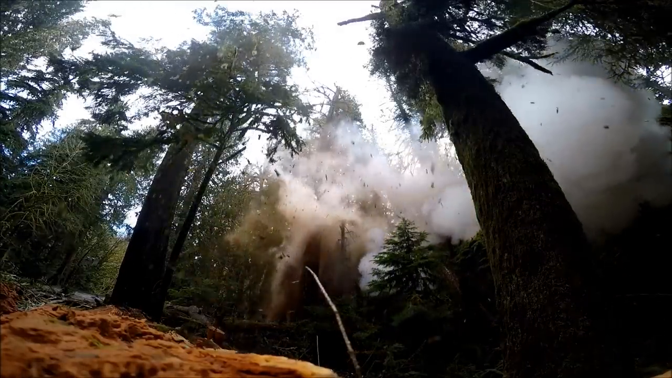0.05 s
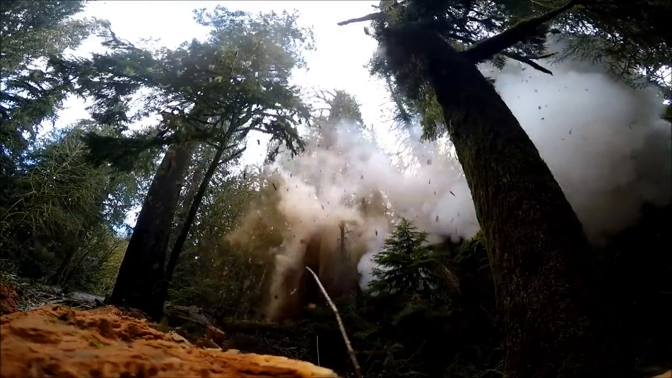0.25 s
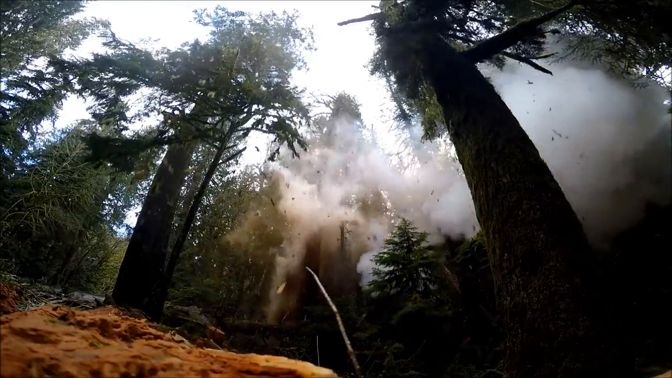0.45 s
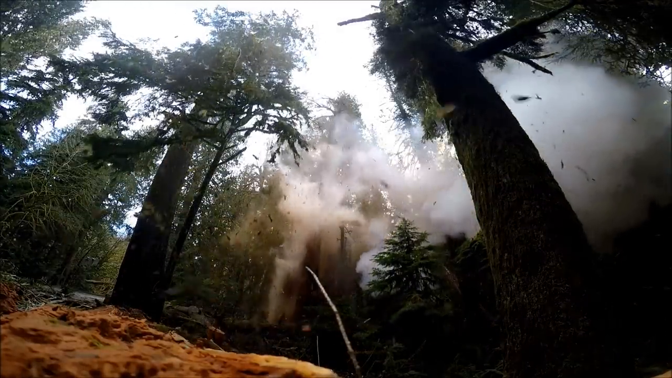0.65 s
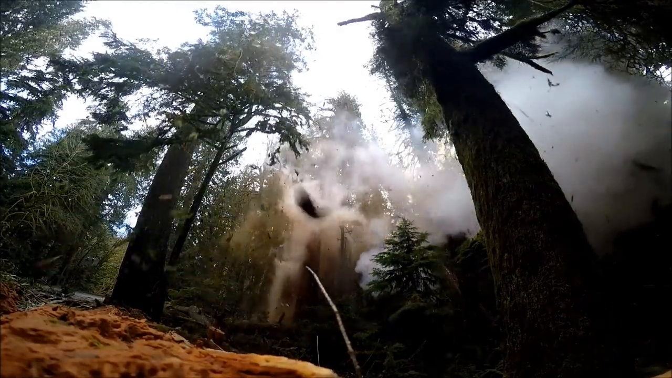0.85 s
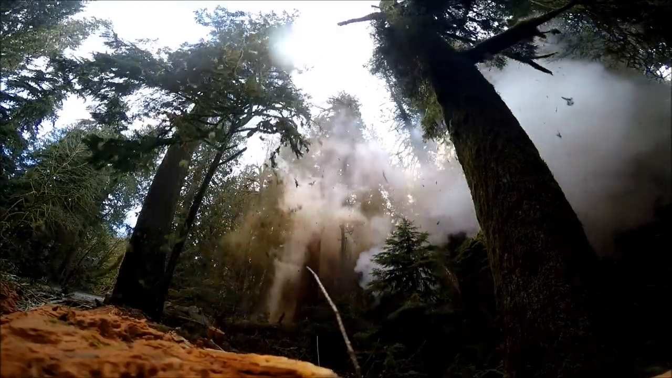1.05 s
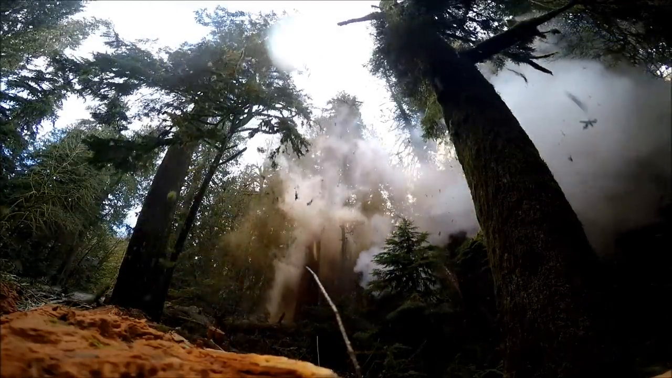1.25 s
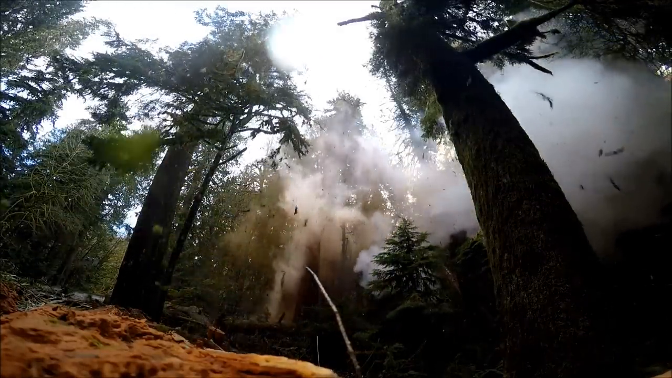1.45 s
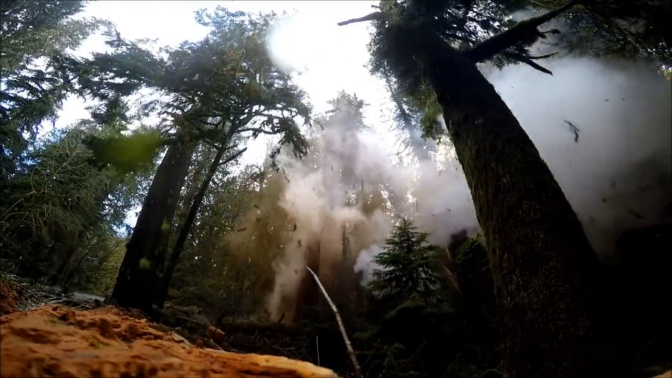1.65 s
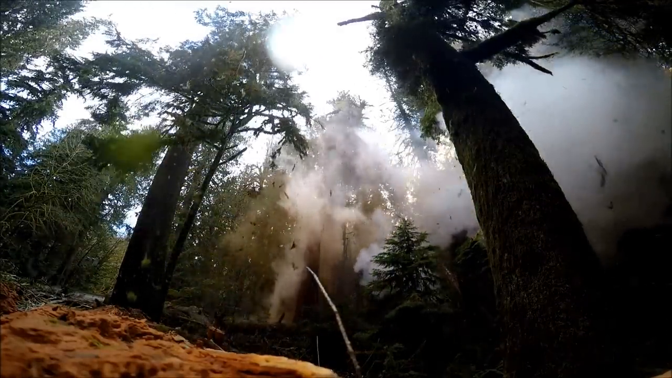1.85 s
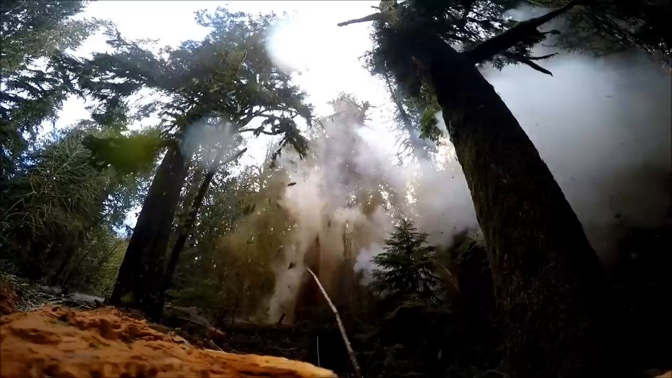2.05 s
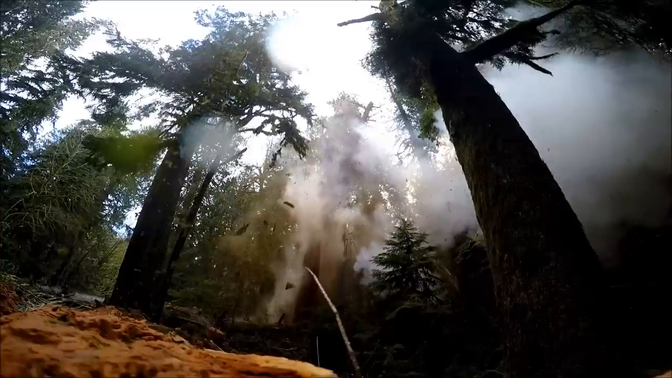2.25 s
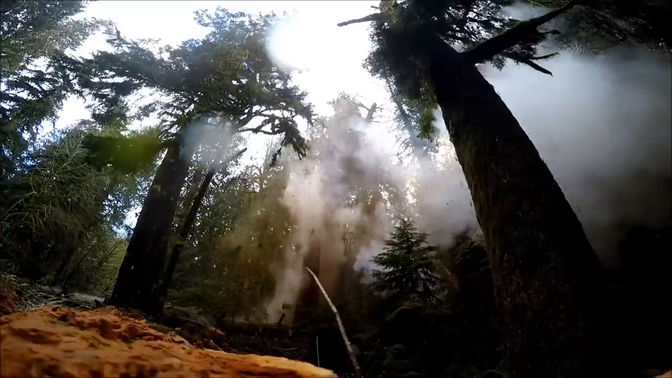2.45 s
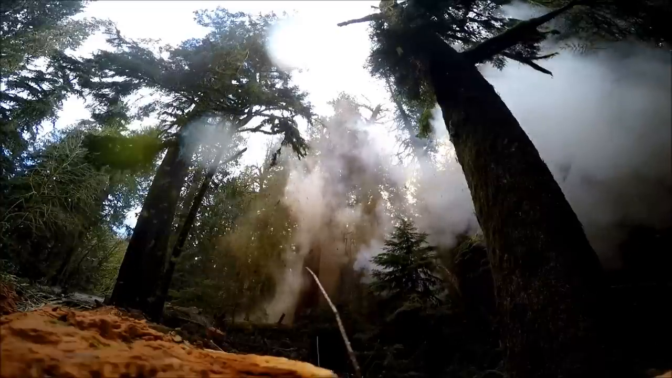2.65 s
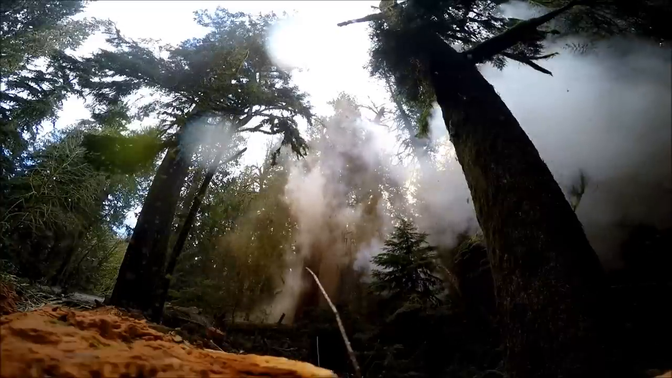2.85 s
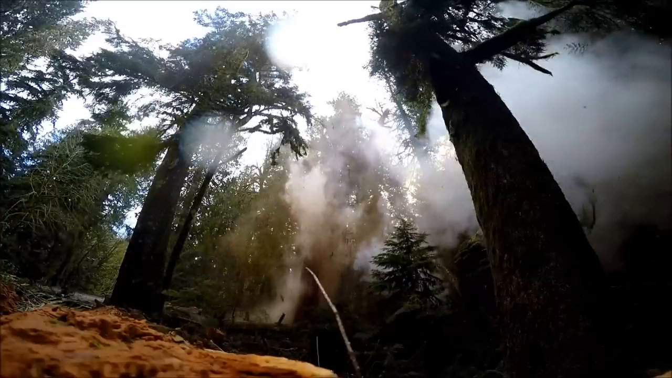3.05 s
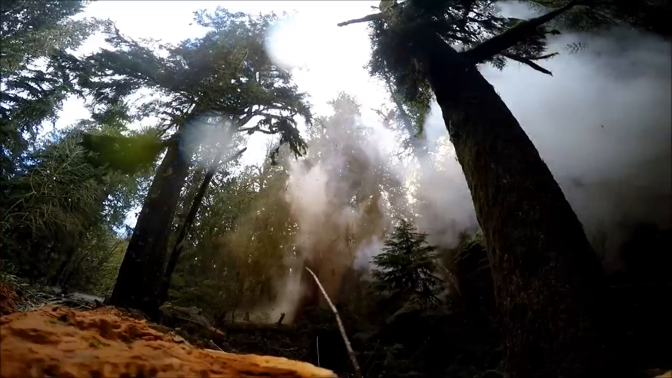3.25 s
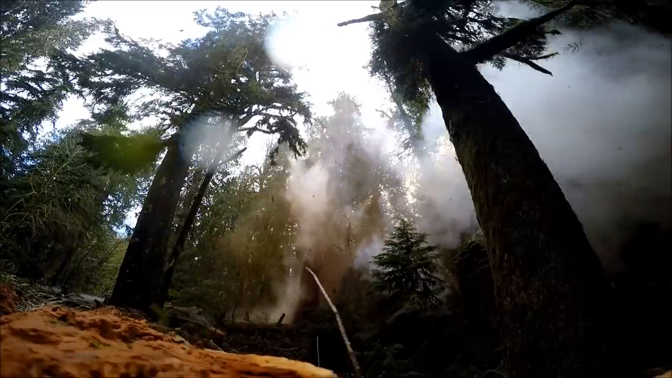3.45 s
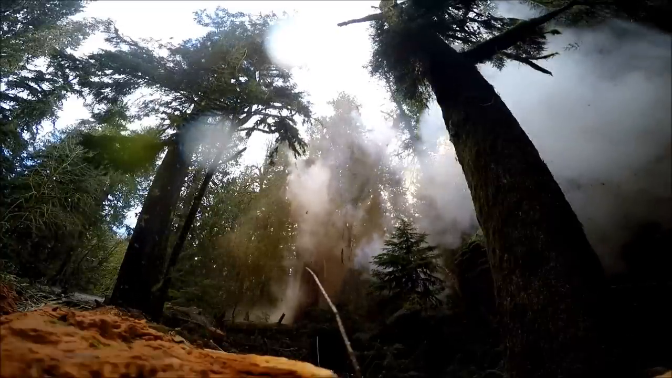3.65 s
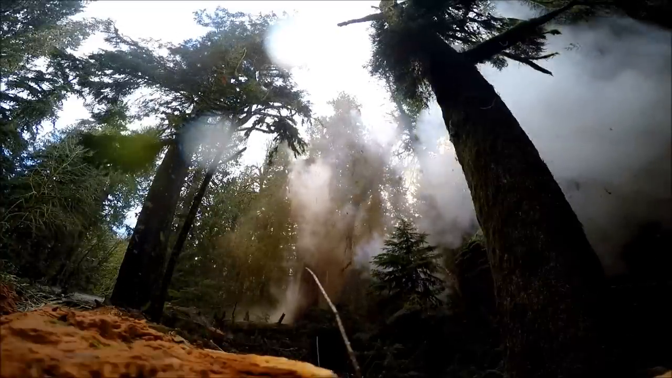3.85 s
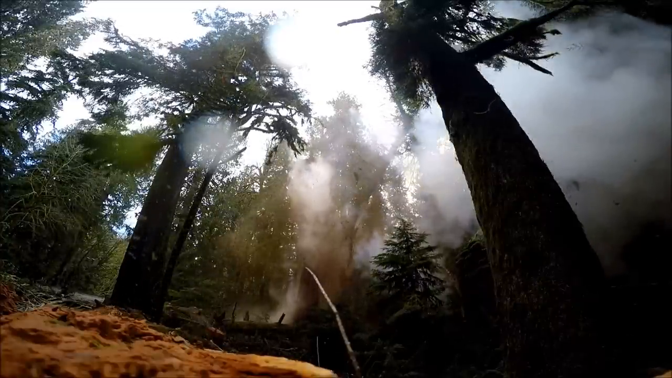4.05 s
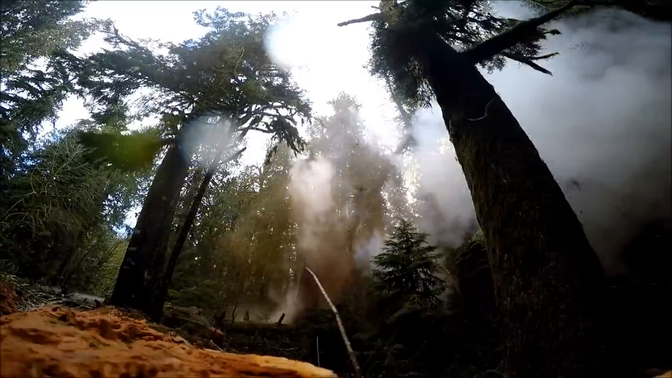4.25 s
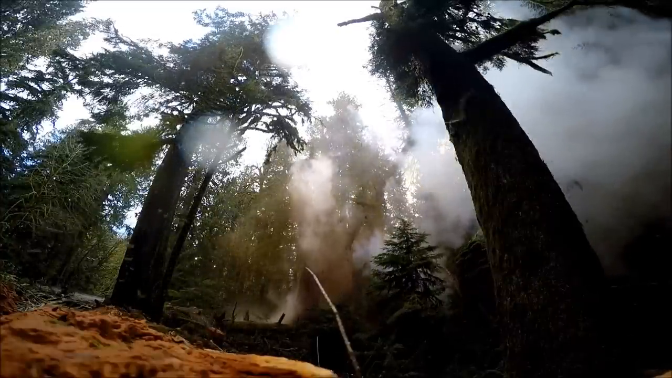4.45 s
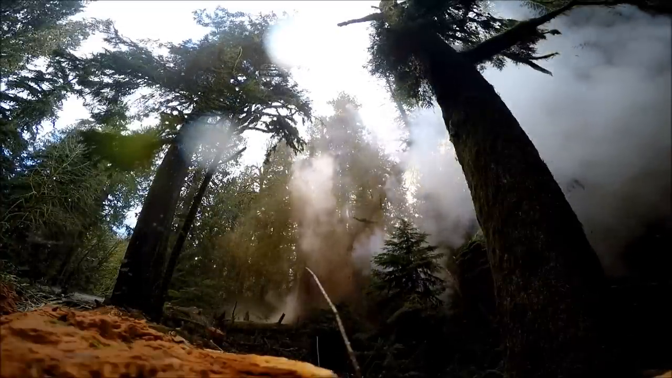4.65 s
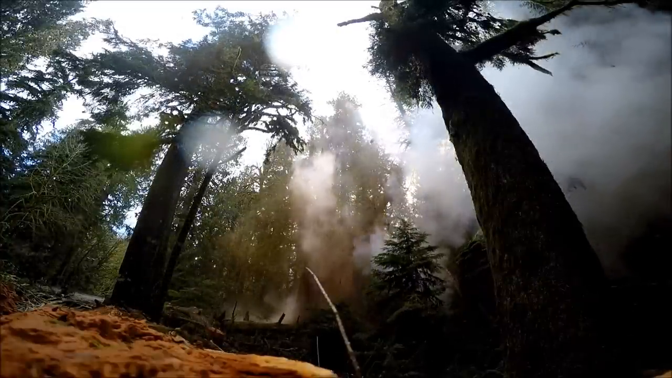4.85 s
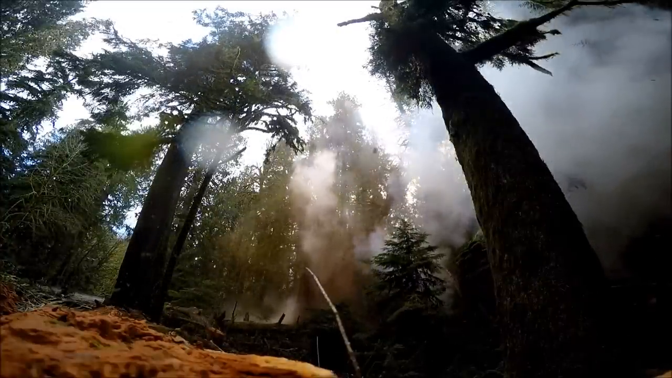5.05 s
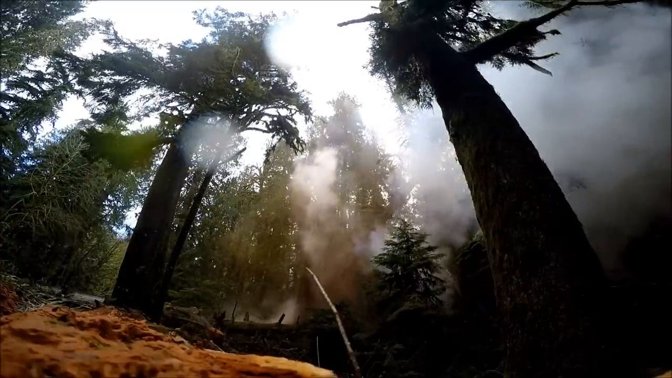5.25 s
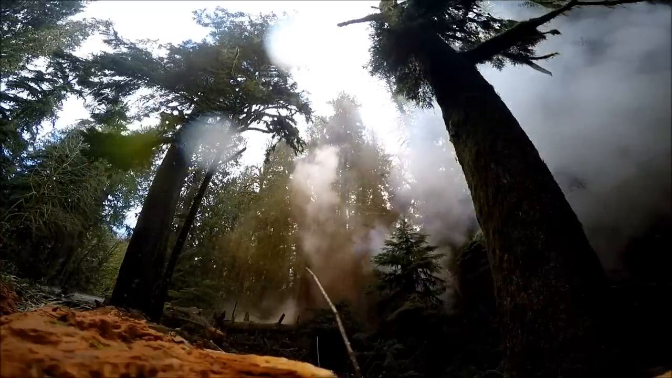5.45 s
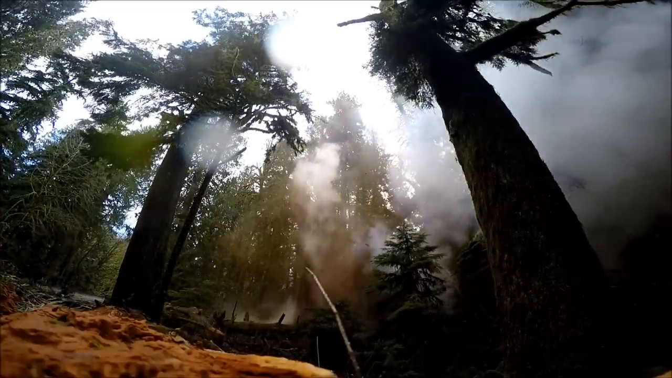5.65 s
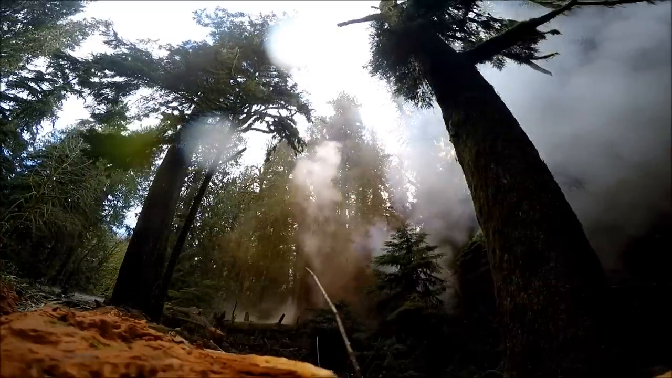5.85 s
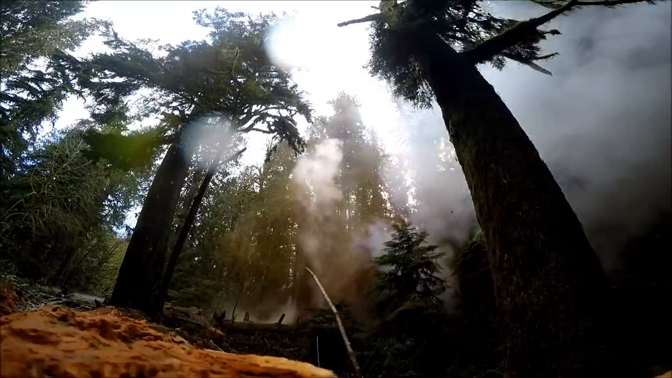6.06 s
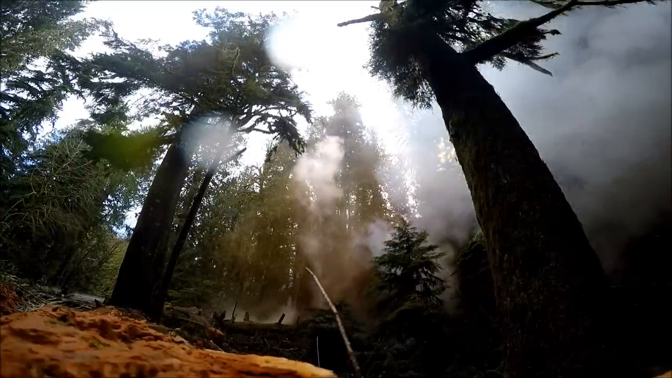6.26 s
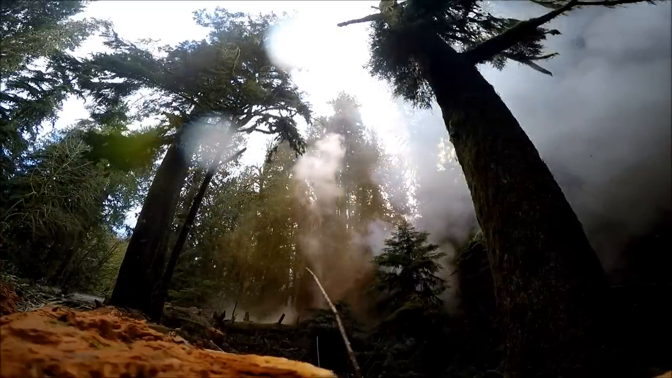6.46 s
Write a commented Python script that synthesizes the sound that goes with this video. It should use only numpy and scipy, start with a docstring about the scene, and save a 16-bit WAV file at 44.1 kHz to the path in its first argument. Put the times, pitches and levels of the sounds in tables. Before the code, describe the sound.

After a tree blast, debris rains onto needles and ground above a deep rumble; hard fragments crack against the camera case, distorting and ducking the sound.

```python
"""Soil and splinters patter down over a ground rumble in a forest; hard knocks overload the microphone.
A tree has just been blasted: debris falls on and around a camera in a hard case on the ground.
Coloured random impacts make the patter, crumb sprays the single landings, decaying modes the blows on the case.
The hardest strikes slam the gain control down and the patter swells back slowly; late on, heavy wood lands
close by in slow swings of the ground. A thin steady whine comes from the camera's electronics."""
import sys
import numpy as np
from scipy import signal
from scipy.fft import rfft, irfft, next_fast_len
from scipy.io import wavfile
from scipy.ndimage import uniform_filter1d

SR = 44100
rng = np.random.default_rng(int(sys.argv[2]) if len(sys.argv) > 2 else 0)


def master_out(mix):
    """Clip the mix to full scale and print it as 16-bit PCM to the path in sys.argv[1]."""
    frames = np.transpose(np.atleast_2d(mix))
    ceiling = np.clip(frames, -1, 1)
    pcm = np.round(ceiling * 32767).astype(np.int16)
    wavfile.write(sys.argv[1], SR, pcm)


N = 287532
T = np.arange(N) / SR

# colour of debris as heard through the case: f/Hz, level/dB
DEBRIS_COLOUR = [(150, -10), (290, -10), (410, -5.5), (540, 2.5), (760, -6.5), (980, -6), (1180, -3),
                 (1480, -9.5), (1850, -7.5), (2150, -6), (2600, -19), (3600, -23), (5300, -31.5),
                 (7500, -42.5)]


def undb(db):
    """Decibels to amplitude gain."""
    return 10 ** (np.asarray(db) / 20)


def unit(x):
    """Scale to rms 1."""
    return x / np.sqrt(np.mean(x ** 2))


def peak_unit(x):
    """Scale to peak 1."""
    return x / np.abs(x).max()


def add(out, start_s, x):
    """Mix x into out from start_s on."""
    i = int(start_s * SR)
    out[i:i + len(x)] += x[:N - i]


def fade(t, t60):
    """Exponential decay, 60 dB in t60 seconds."""
    return np.exp(-np.log(1000) * t / t60)


def colour(x, points, tilt_db=0):
    """Minimum-phase filter from (f/Hz, level/dB) points, tilted in dB/octave about 1 kHz; clicks stay sharp."""
    size = next_fast_len(len(x) + 4096, real=True) // 2 * 2
    octave = np.log2(np.maximum(np.fft.rfftfreq(size, 1 / SR), 1) / 1000)
    hz, db = np.transpose(points)
    gain_db = np.interp(octave, np.log2(hz / 1000), db)
    gain_db = gain_db + tilt_db * np.maximum(octave, -2)  # no further tilt below 250 Hz
    # fold the cepstrum onto positive time: causal response
    cepstrum = irfft(np.log(undb(gain_db)))
    cepstrum[1:size // 2] *= 2
    cepstrum[size // 2 + 1:] = 0
    response = np.exp(rfft(cepstrum))
    return irfft(rfft(x, size) * response)[:len(x)]


def walk(rate_hz):
    """Random levels held 1 / rate_hz and smoothed twice; rms near 1."""
    hold = int(SR / rate_hz)
    steps = np.repeat(rng.standard_normal(N // hold + 1), hold)
    smooth = uniform_filter1d(uniform_filter1d(steps, hold), hold)
    return unit(smooth[:N])


def grains(count, per_s, spread_db):
    """Random single-sample impacts of either sign in count samples, many weak and few strong."""
    size = undb(spread_db * np.minimum(rng.exponential(size=count), 5))
    hit = rng.random(count) < per_s / SR
    return hit * size * rng.choice([-1, 1], count)


def ring(modes, tilt_db=0, spot_hz=1000, spot_db=0):
    """Decaying modes after one blow, peak 1; those near spot_hz are driven by up to spot_db more."""
    t = T[:SR // 2]
    x = 0
    for k, (hz, db, t60) in enumerate(modes):
        spot = np.exp(-10 * np.log2(hz / spot_hz) ** 2)
        drive_db = tilt_db * np.log2(hz) + spot_db * spot
        mode = fade(t, t60) * np.sin(2 * np.pi * hz * t)
        x = x + (-1) ** k * undb(db + drive_db) * mode  # alternating polarity
    return peak_unit(x)


def spray(t60, tilt_db):
    """A clod bursts into quickly thinning crumbs; rms 1 over the first 10 ms."""
    t = T[:SR // 2]
    crumbs = grains(len(t), per_s=5900, spread_db=3.0) * fade(t, t60)
    x = colour(crumbs, DEBRIS_COLOUR, tilt_db)
    return x / np.sqrt(np.mean(x[:SR // 100] ** 2))


def landing(t60, tilt_db, hz):
    """A spray of crumbs excites a resonance of the wood it meets; the shorter the contact, the more it rings."""
    width_hz = 150
    equal_mix_s = 0.125  # spray t60 at which the resonance is mixed in at gain 1
    x = spray(t60, tilt_db)
    wood = signal.lfilter(*signal.iirpeak(hz, hz / width_hz, fs=SR), x)
    return x + equal_mix_s / t60 * wood


def whine():
    """Thin steady sine from the camera's electronics."""
    whine_hz, rms_db = 6309, -69
    return undb(rms_db) * np.sqrt(2) * np.sin(2 * np.pi * whine_hz * T)


def rumble(flurry):
    """Heavy lumps shake the ground: low-coloured impacts, thinning steadily."""
    # ground spectrum: f/Hz, level/dB
    ground_colour = [(10, -14), (20, -3), (45, 0), (80, -4.5), (120, -10.5), (170, -18.5), (260, -30),
                     (500, -68)]
    start_db, sag_db_per_s = -12.5, 2.5
    lumps = unit(colour(grains(N, per_s=400, spread_db=0.9), ground_colour))
    return lumps * undb(start_db - sag_db_per_s * T + 0.8 * flurry)


def flow():
    """Strength of the fine soil fall: steady thinning, with showers that swell quickly and die away on top."""
    # soil coming down through the crowns: start t/s, peak level/dB, rise/s, t60/s
    showers = [(0.86, -33, 0.056, 1.25), (2.64, -40, .08, 3.7), (3.62, -36, .06, 3.8),
               (4.36, -34, 0.022, 10.4), (5.26, -36, 0.15, 2.2), (5.882, -34, 0.043, 0.63)]
    start_db, sag_db_per_s = -31, 2.5
    power = undb(start_db - sag_db_per_s * T) ** 2
    for start_s, db, rise_s, t60 in showers:
        rise = np.clip((T - start_s) / rise_s, 0, 1)
        decay = fade(np.maximum(T - start_s - rise_s, 0), t60)
        power = power + (undb(db) * rise * decay) ** 2
    return np.sqrt(power)


def clods():
    """Small clods tick on twigs at random times, each with its own ring."""
    count, t60_s = 70, 0.084
    level_db, spread_db = -4, 2.5  # relative to the patter
    centre_hz, spread_octaves = 1500, 0.32
    out = np.zeros(N)
    times = rng.uniform(0, T[-1], count)
    for start_s, (size, pitch) in zip(times, rng.standard_normal((count, 2))):
        hz = centre_hz * 2 ** (spread_octaves * np.clip(pitch, -2, 2))
        clod = landing(t60_s, tilt_db=1.2, hz=hz)
        add(out, start_s, undb(level_db + spread_db * size) * clod)
    return out


def patter(flurry):
    """Fine soil on needles and ground: distinct crumbs over far landings merged into noise, with clods."""
    crumbs = unit(colour(grains(N, per_s=910, spread_db=3.5), DEBRIS_COLOUR))
    far = unit(colour(rng.standard_normal(N), DEBRIS_COLOUR))
    soil = unit(crumbs + undb(-0.5) * far)
    return (soil + clods()) * flow() * undb(1.1 * flurry)


def debris():
    """Rumble and patter rise and fall in the same flurries."""
    flurry = walk(rate_hz=30)
    return rumble(flurry) + patter(flurry)


def landings():
    """Larger clods and sticks landing nearby: crumb sprays that ring wood and stand out from the patter."""
    # single landings: t/s, spray level/dB, tilt/(dB/octave), spray t60/s, wood ring f/Hz
    nearby = [(0.056, -16, 0.5, 0.072, 1260), (0.184, -17, 0.7, 0.042, 2250),
              (0.302, -26.5, 2.8, 0.049, 1280), (0.553, -19, -0.6, 0.079, 530), (0.878, -27, 0, 0.11, 507),
              (0.923, -28.5, -4, 0.019, 2090), (1.214, -25, -2.5, 0.059, 2160),
              (1.392, -31.5, 4, 0.063, 1730), (1.41, -30, -5, 0.025, 1660), (2.501, -33.5, 6, 0.06, 548),
              (2.765, -26, -7.5, 0.042, 1184), (2.876, -21, -0.5, 0.13, 1260),
              (3.037, -31.5, -1.5, 0.08, 540), (3.172, -37, 1.5, 0.032, 1280),
              (3.31, -37.5, 3, 0.051, 1900), (3.351, -35.5, -0.5, 0.035, 1974),
              (3.645, -28.5, -0.5, 0.23, 540), (3.84, -30, 0.5, 0.081, 2040), (4.112, -33.5, 0, 0.089, 530),
              (4.213, -28.5, -1, 0.1, 550), (4.393, -27.5, -0.5, 0.025, 2080),
              (4.457, -31, -0.2, 0.05, 1324), (4.575, -25.5, 0.3, 0.14, 1110),
              (5.061, -27.5, -6.5, 0.019, 864), (5.067, -28.5, -18, 0.08, 229),
              (5.083, -36.5, -6.5, 0.045, 480), (5.165, -32.5, 0, 0.062, 920),
              (5.262, -25.5, -1.5, 0.13, 1010), (5.276, -23, -0.5, 0.15, 1770),
              (5.93, -35.5, 1.2, 0.081, 594), (6.15, -33, 0.2, 0.091, 1080)]
    out = np.zeros(N)
    for start_s, db, tilt_db, t60, hz in nearby:
        add(out, start_s, undb(db) * landing(t60, tilt_db, hz))
    return out


def thuds():
    """Heavy wood shakes the ground and rocks the camera: slow sine swings that swell and die."""
    # ground swings: t/s, level/dB, f/Hz, length/s
    swings = [(5.085, -3, 33.6, 0.046), (5.115, -6.5, 17.5, 0.21), (5.902, -16.5, 74, 0.031),
              (5.941, -14.5, 71, 0.031)]
    out = np.zeros(N)
    for start_s, db, hz, length_s in swings:
        t = T[:int(length_s * SR)]
        swell = np.sin(np.pi * t / length_s) ** 0.46
        add(out, start_s, undb(db) * swell * np.sin(2 * np.pi * hz * t))
    return out


def strikes():
    """Fragments crush against the case, ring its mount and shove the air inside into one slow swing."""
    # fragments: t/s, knock level/dB, tilt/(dB/octave), struck spot f/Hz, spot lift/dB,
    # mount ring level/dB, shove level/dB, shove direction (+1 or -1), shove rise/s
    fragments = [(0.4595, 20.5, -4.5, 1202, 10.5, -18, 14.5, 1, 0.01),
                 (0.4657, 16, -2.5, 1040, 4.5, -20.5, -9.5, 1, 0.014),
                 (0.4807, 4, -8, 1317, 4.5, -18, -19, -1, 0.014),
                 (.833, -2, 7.5, 983, 9, -58, -21.5, 1, .008),
                 (1.5242, 21.5, -5.5, 1070, 10.5, -18, 19.5, 1, 0.012),
                 (1.5461, 25.5, -4, 737, 4.5, 1, 5, -1, .006),
                 (1.958, 38.5, -1.5, 3500, 5.5, 17, 33.5, -1, 0.013),
                 (4.0148, 8, 5.5, 1610, 3, -48, -39, -1, .008)]
    # short modes of the case: f/Hz, level/dB, t60/s
    case_modes = [(720, -5.5, 0.014), (1040.7, -2.5, 0.03), (1170, -4, 0.018), (1495, -1.5, 0.02),
                  (1612.5, -8.5, 0.017), (2046, -5, 0.013), (2840, -11.5, 0.011), (3134, -13.5, 0.0088),
                  (3593, -8, 0.01), (4286, -16, 0.0056), (5060, -14, 0.0077), (5937, -18.5, .007),
                  (6530, -21.5, 0.0082), (7500, -26.5, 0.0071)]
    # lingering modes of the mount: f/Hz, level/dB, t60/s
    mount_modes = [(907, 0, 0.27), (990, -12, 0.14), (1270, -9.5, .075), (1350, -10.5, .14),
                   (1393, -10, 0.076)]
    # dull modes of the case as a whole: f/Hz, level/dB, t60/s
    body_modes = [(86.44, 0.5, 0.081), (165, 3, 0.025), (250, 0, 0.041), (321, -2, 0.034), (426, -8, 0.021)]
    out, t = np.zeros(N), T[:SR // 2]
    leak_hz = 11.0  # the pressure leaks away and overshoots
    leak = signal.butter(2, leak_hz, "high", fs=SR, output="sos")
    for (start_s, knock_db, tilt_db, spot_hz, spot_db,
         mount_db, shove_db, direction, rise_s) in fragments:
        grit = np.interp(knock_db, [8, 22], [.05, .15])  # light chips touch cleanly, heavy clods crumble
        contact = grit * rng.standard_normal(len(t)) * fade(t, t60=0.021)
        contact[0] = 1
        case = ring(case_modes, tilt_db, spot_hz, spot_db)
        knock = peak_unit(signal.fftconvolve(contact, case)[:len(t)])
        knock = knock + undb(-36.5) * spray(t60=0.027, tilt_db=2)
        push = (t / rise_s * np.exp(-t / rise_s)) ** 3
        swing = peak_unit(signal.sosfilt(leak, push))
        shove = np.sign(direction) * (swing + undb(-1.5) * ring(body_modes))
        mount = undb(mount_db) * ring(mount_modes)
        add(out, start_s, undb(knock_db) * knock + mount + undb(shove_db) * shove)
    return out


def scene():
    """Everything that reaches the microphone, plus the whine."""
    return (whine() + debris() + landings() + thuds() + strikes())[None]


def gain_control(x, threshold_db):
    """Peaks over the threshold cut the gain within milliseconds; it climbs back at a steady dB rate."""
    start_gain_db, release_db_per_s, attack_s = -10.5, 8.5, 0.0087
    over_db = np.maximum(20 * np.log10(np.abs(x) + 1e-9) - threshold_db, 0)
    over_db[0] = -start_gain_db  # begins already turned down
    climb_db = release_db_per_s * T
    cut_db = np.maximum.accumulate(over_db + climb_db) - climb_db
    pole = np.exp(-1 / (attack_s * SR))
    # smooth the change from the starting gain
    change_db = signal.lfilter([1 - pole], [1, -pole], cut_db + start_gain_db)
    return x * undb(start_gain_db - change_db)


def record(dry):
    """Gain control too slow for the strikes, faint hiss, soft overload, band limit, hard clip, final low-pass."""
    ceiling_db, band_hz, top_hz = -0.16, 7500, 16000
    x = gain_control(dry[0], threshold_db=4.0)
    x = x + undb(-85.0) * rng.standard_normal(N)
    x = undb(ceiling_db) * x / (1 + x ** 6) ** (1 / 6)
    band = signal.ellip(8, .05, 50, band_hz, fs=SR, output="sos")
    x = signal.sosfiltfilt(band, x)
    x = np.clip(x, -1, 1)
    top = signal.ellip(8, .2, 70, top_hz, fs=SR, output="sos")
    return signal.sosfilt(top, x)[None]


dry = scene()
out = record(dry)
master_out(out)
```